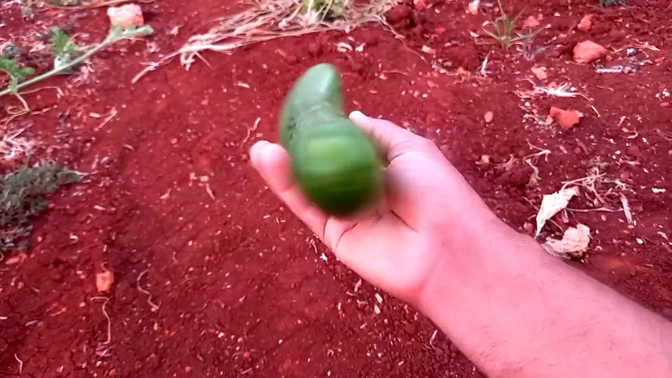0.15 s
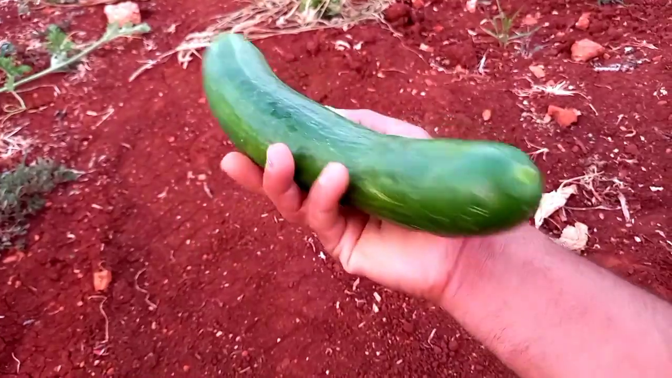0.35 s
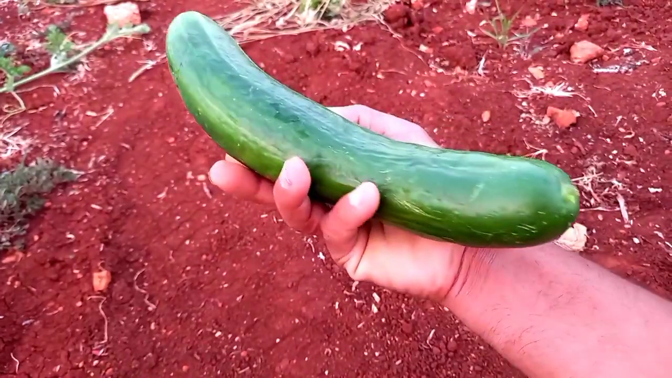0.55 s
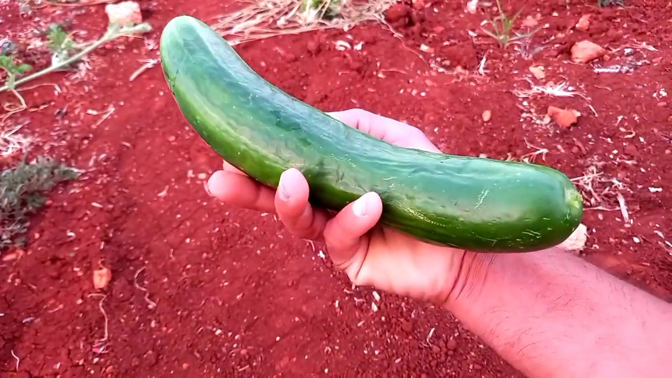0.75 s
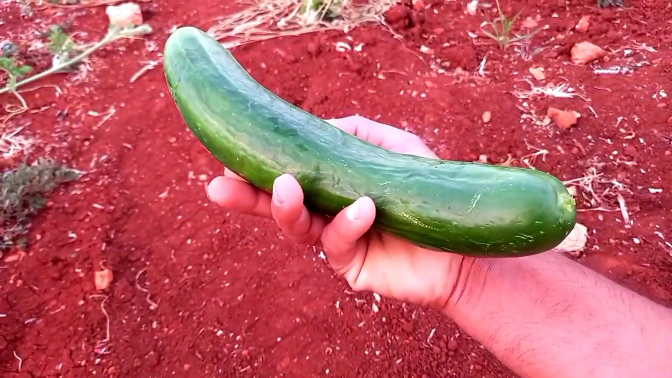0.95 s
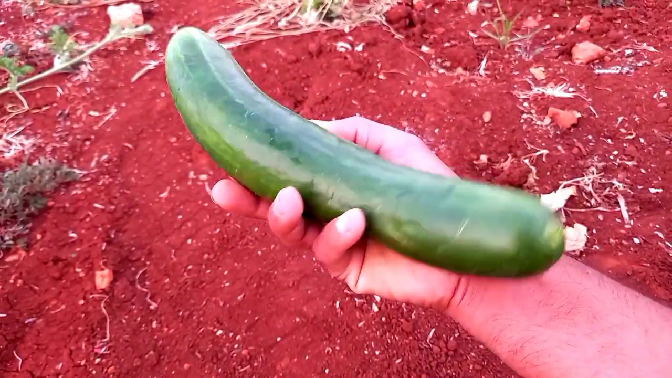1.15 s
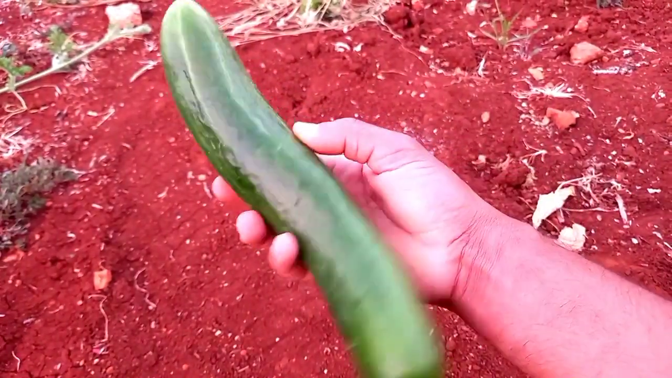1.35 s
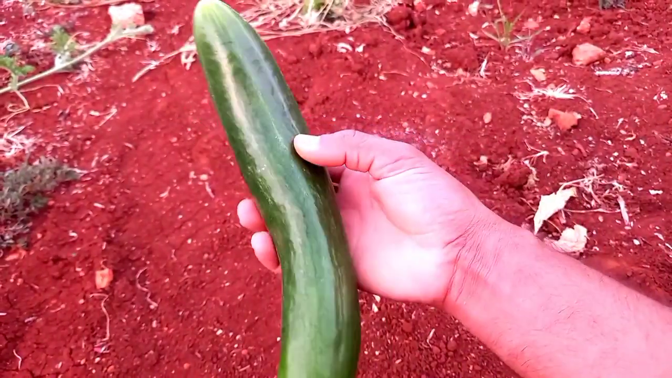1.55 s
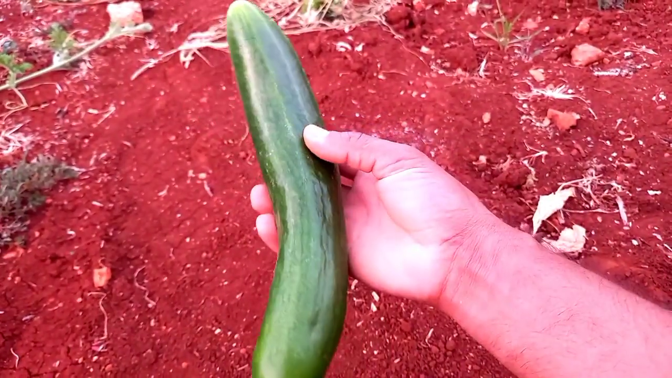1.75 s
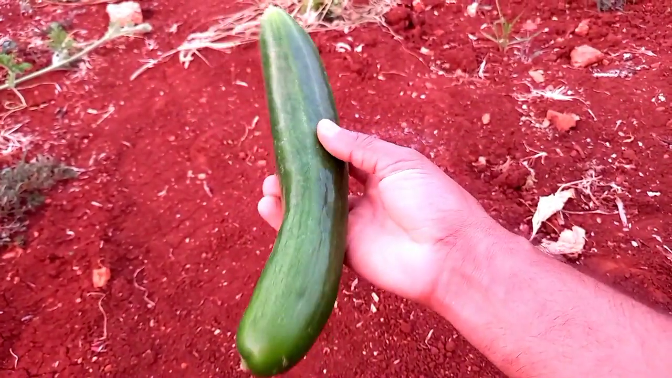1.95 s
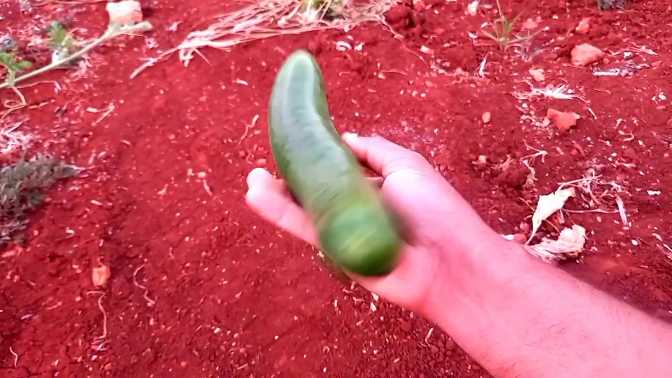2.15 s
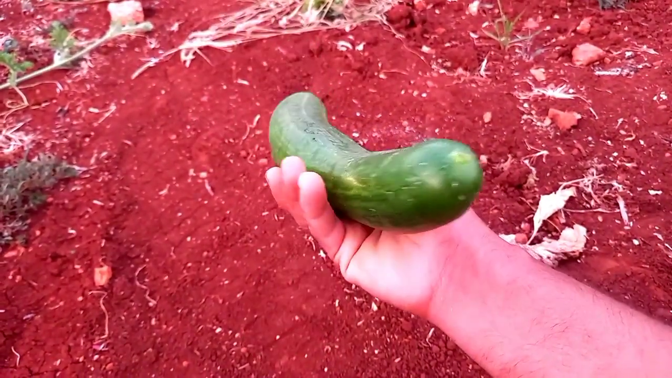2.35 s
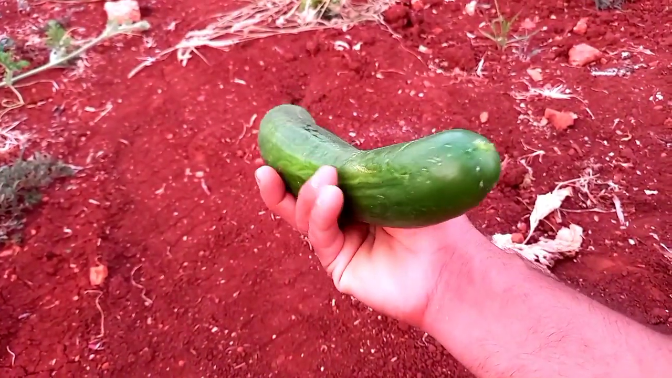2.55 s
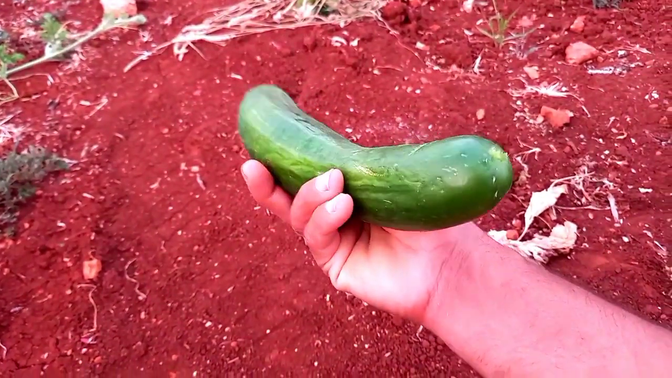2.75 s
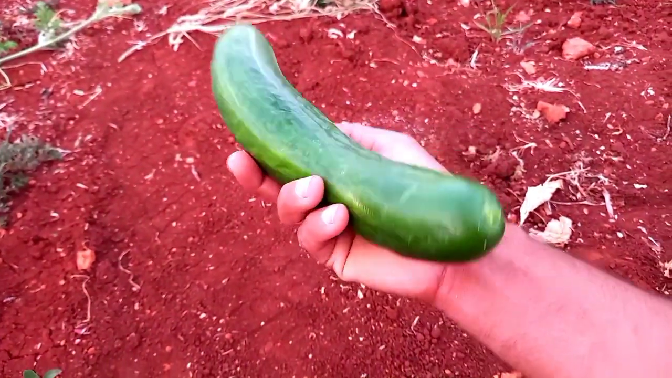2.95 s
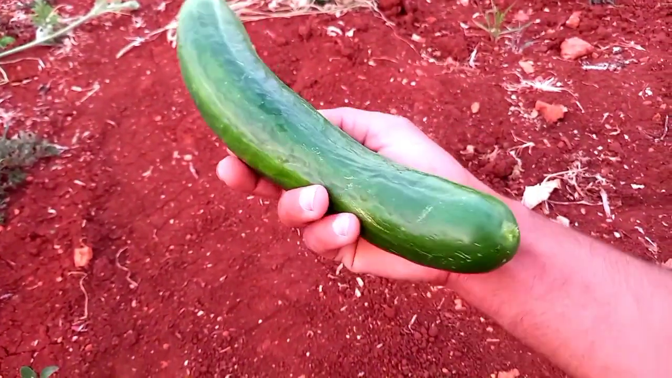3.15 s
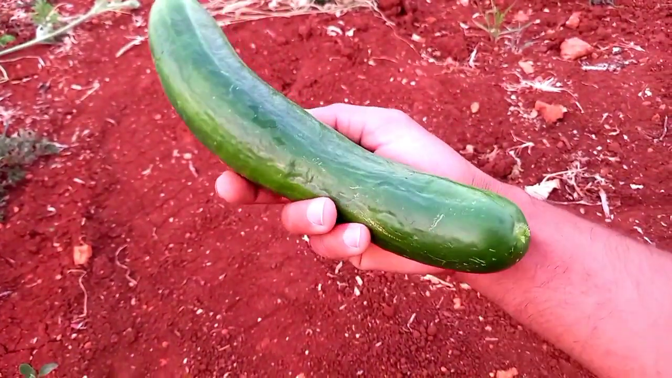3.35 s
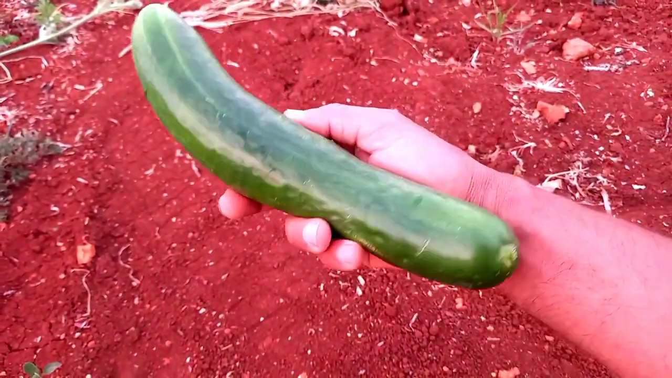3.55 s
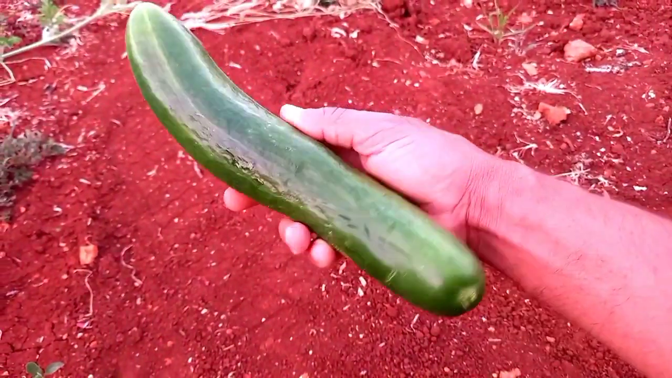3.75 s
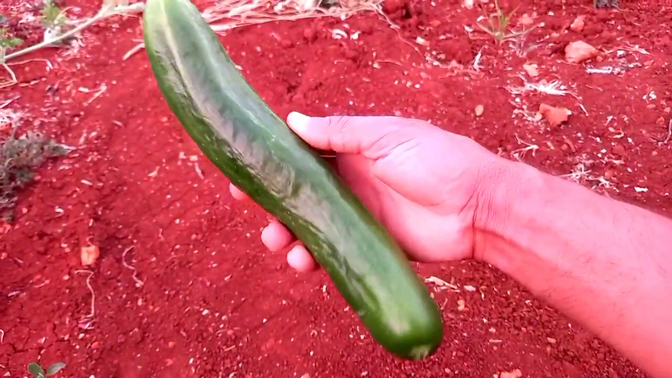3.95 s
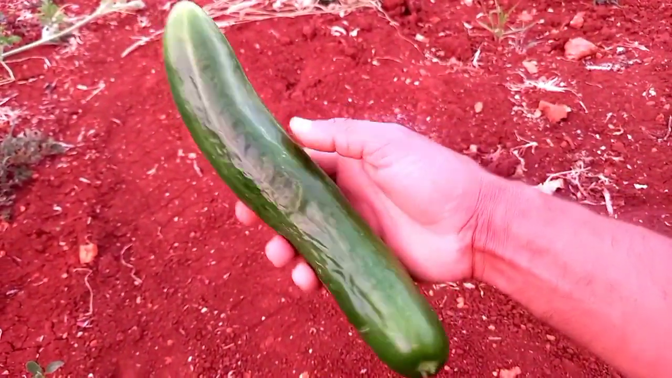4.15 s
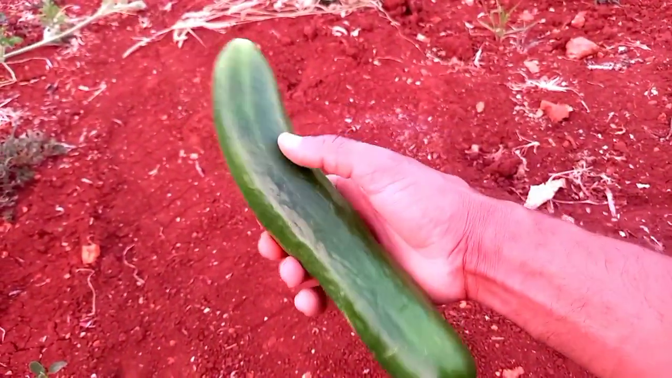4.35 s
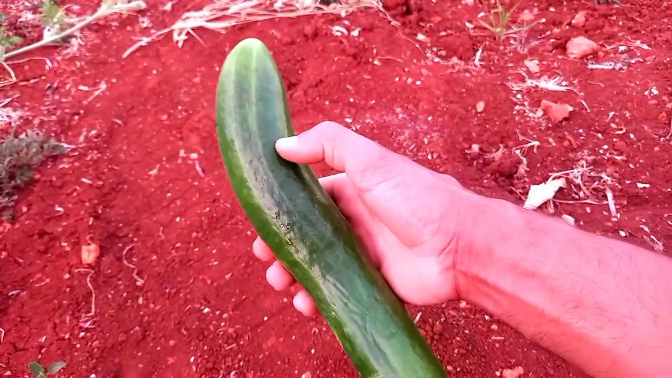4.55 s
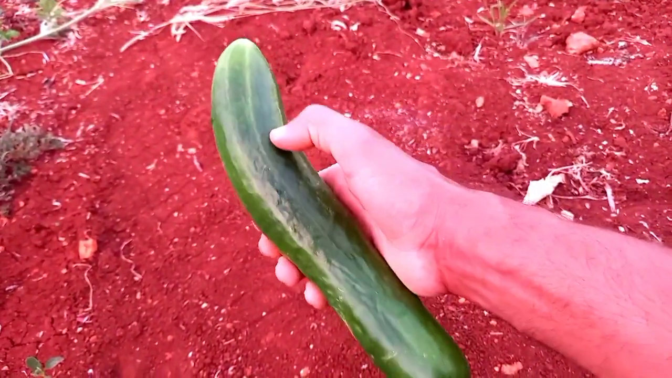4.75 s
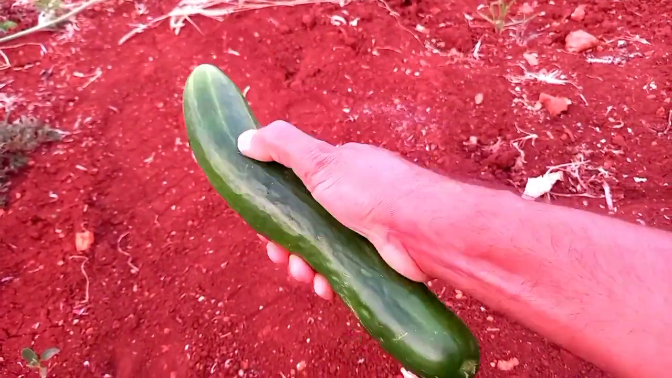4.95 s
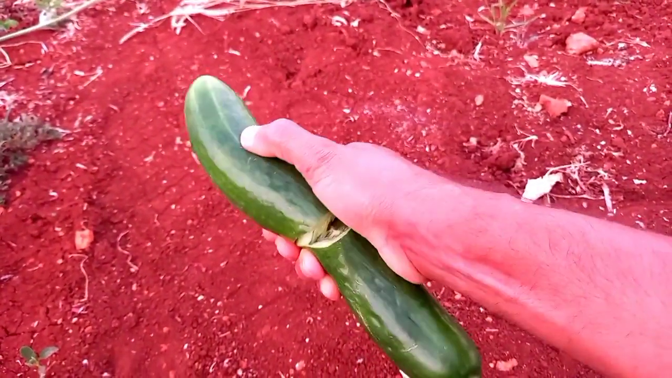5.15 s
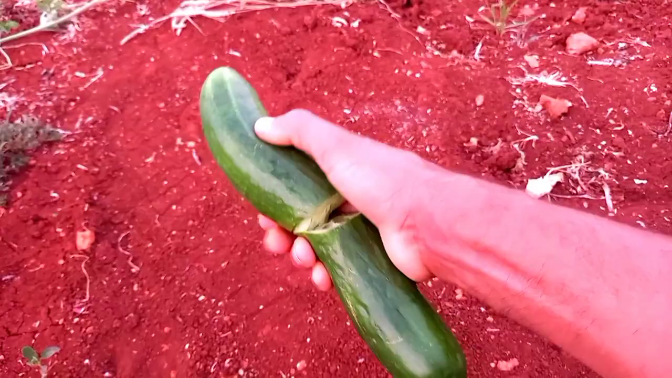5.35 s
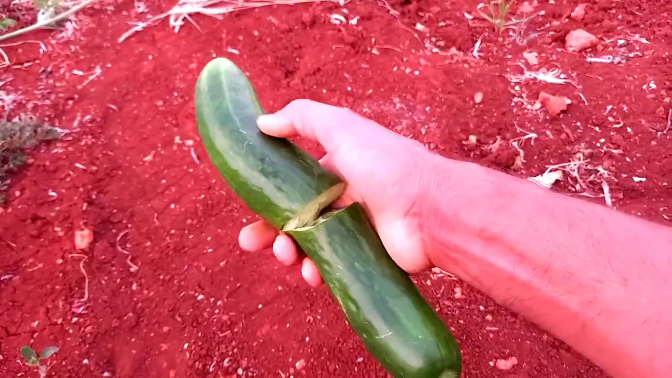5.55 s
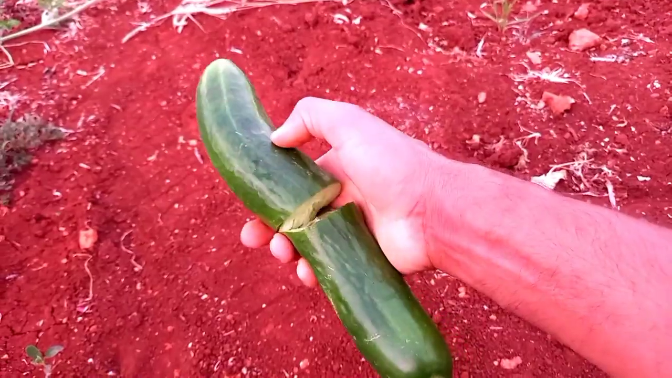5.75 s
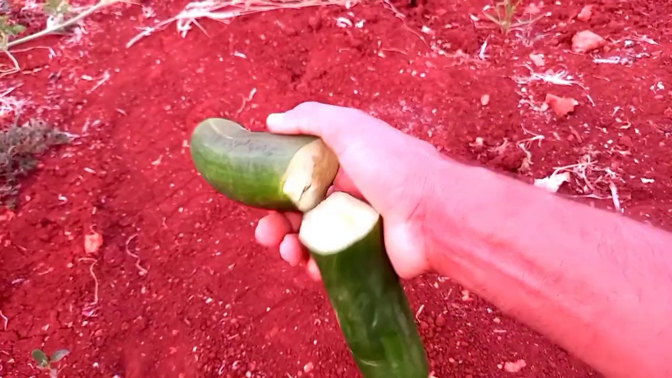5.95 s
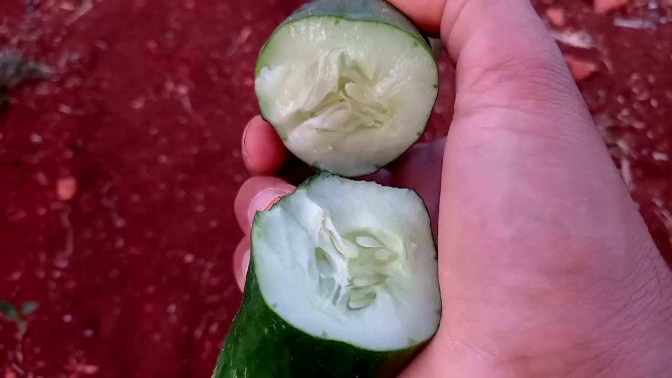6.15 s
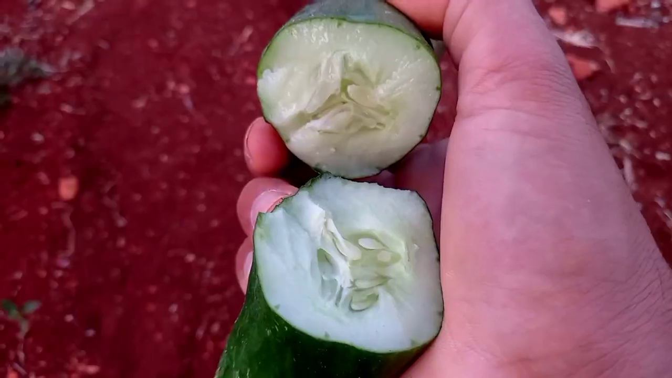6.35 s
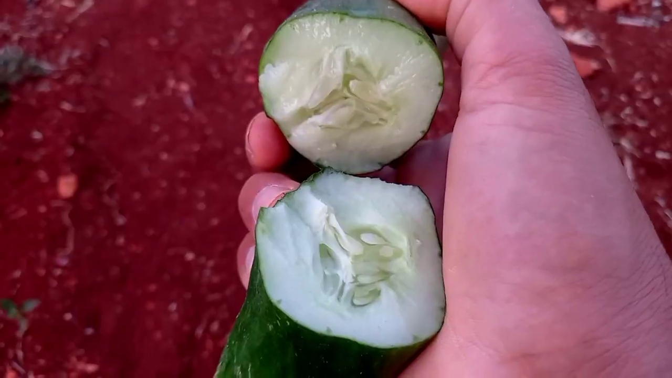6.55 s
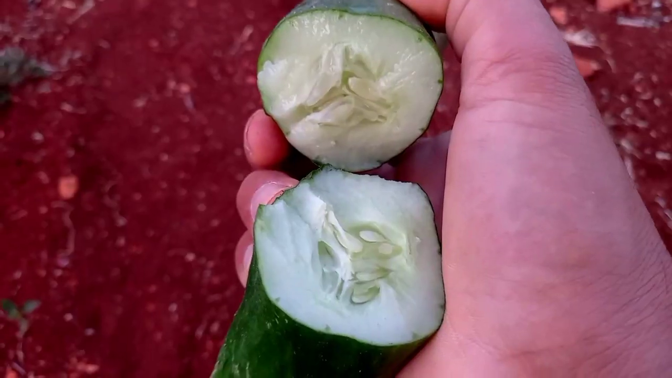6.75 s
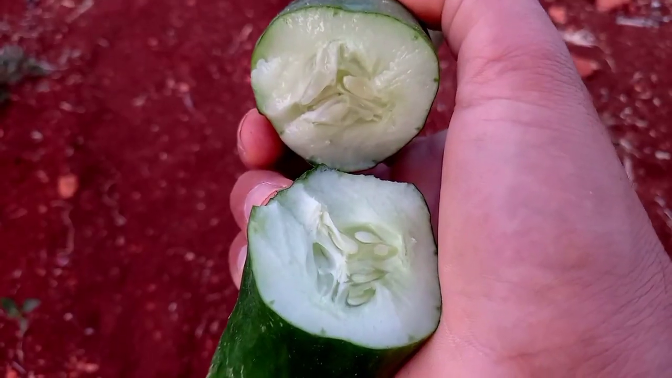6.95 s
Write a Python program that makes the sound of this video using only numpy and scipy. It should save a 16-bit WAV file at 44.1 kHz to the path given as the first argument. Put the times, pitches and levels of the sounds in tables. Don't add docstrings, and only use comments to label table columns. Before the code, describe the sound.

A quiet open field with faint low rumble, thin hiss and almost no reverberation. From 0 to 0.8 s, small sliding bird whistles sound at left while skin softly rubs on cucumber rind; a distant warble comes from ahead at 0.6 and again, clearest, at 1.4 s. Soft low hand bumps occur near 0.7, 2.0 and 2.4 s. From 2.2 s a nearer bird at left chirps in quick short phrases, with a rising ticking trill around 2.8 to 3.05 s, and again near 3.6 and 4.3 s. Grip rub grows slightly. At 5.12 s a very loud, sharp, crisp crack bursts close up, with wet crackle dying in a fraction of a second. Background hiss is a little stronger; whistles return at 5.3 to 5.7 s. From 5.83 s a juicy tear crackles, densest with hollow knocks near 5.9 s, with a last small snap at 6.03 s. A low coo follows, then a fade to silence by 6.4 s.

```python
import sys
import numpy as np
from scipy import signal
from scipy.fft import rfft, irfft
from scipy.io import wavfile
from scipy.ndimage import uniform_filter1d

SR = 44100
rng = np.random.default_rng(int(sys.argv[2]) if len(sys.argv) > 2 else 0)


def file_out(sig):
    cols = np.atleast_2d(sig).T
    lim = np.clip(cols, -1, 1)
    pcm = np.round(lim * 32767).astype(np.int16)
    wavfile.write(sys.argv[1], SR, pcm)


def nominal_scale(level):
    x = np.asarray(level, float) / 20
    return 10 ** x


N = 309164
T = np.arange(N) / SR


def evened(x):
    return x / np.sqrt(np.mean(x ** 2) + 1e-20)


def drift(shape, size):
    return evened(uniform_filter1d(rng.standard_normal(shape), size=size))


def read(points, hz):
    f, value = np.transpose(points)
    return np.interp(np.log(hz + 1), np.log(f + 1), value)


def level(table):
    return nominal_scale(np.interp(T, *np.transpose(table)))


def add(mix, s, sound):
    part = mix[..., round(s * SR):][..., :sound.shape[-1]]
    part += sound[..., :part.shape[-1]]


def colour(x, spectrum):
    db = read(spectrum, abs(np.fft.fftfreq(4096, 1 / SR)))
    log_gain = np.log(nominal_scale(np.maximum(db, -100)))
    taps = np.fft.ifft(np.exp(np.conj(signal.hilbert(log_gain)))).real[:1024]
    return signal.oaconvolve(x, taps[None] / np.linalg.norm(taps))[:, :N]


def ports(x, other, same, lag):
    hz = np.fft.rfftfreq(N, 1 / SR)
    likeness = np.clip(read(same, hz), 0, 1)
    shared = likeness * rfft(x) * np.exp(-2j * np.pi * hz * lag / SR)
    right = shared + np.sqrt(1 - likeness ** 2) * rfft(other)
    return np.array([x, irfft(right, N)])


QUIET_EDGE_HZ = 15600


def wash(spectrum, same, patchy_db, size):
    hz = np.fft.rfftfreq(size, 1 / SR)
    z = signal.stft(ports(*rng.standard_normal((2, N)), same, 22), nperseg=size)[2]
    patches = uniform_filter1d(rng.standard_normal(z.shape[1:]), size=9, axis=0)
    patches = evened(uniform_filter1d(patches, size=5, axis=1))
    z = z * nominal_scale(read(spectrum, hz)[:, None] + patchy_db * patches)
    z = z * (hz < QUIET_EDGE_HZ)[:, None]
    return evened(signal.istft(z, nperseg=size)[1][:, :N])


# f/Hz, level/dB per Hz
RUMBLE = [(12, -58), (20, -25), (48, -18.5), (68, -2.5), (81, 3), (94, -2.5), (114, -9.5), (207, -25),
          (282, -22.5), (375, -30.5), (422, -28), (560, -35), (700, -39), (910, -67), (1540, -120)]
# f/Hz, level/dB per Hz
HISS = [(88, -26.5), (150, 6), (205, -11), (279, -4), (373, -9.5), (420, -8), (561, -12.5), (877, -13.5),
        (2230, -20.5), (3550, -25), (6350, -30), (7410, -33), (12800, -24.5), (15500, -26.5)]
# f/Hz, likeness/0..1
FAR_SAME = [(30, .1), (60, 0.49), (200, 0.35), (400, 0.054), (800, 0.23)]
# t/s, level/dB
LIFT = [(5.1, 5.5), (5.16, 10), (5.8, 9), (6.3, 8.5)]
# t/s, f/Hz, peak level/dB, left-right/dB
BUMPS = [
    (2.4, 78, -49, -6),
    (1.96, 65, -54, -6),
    (.7, 90, -56, 8),
]
RUMBLE_DB, RUMBLE_SHARE, SWELL_DB = -68.5, 0.94, 1.0
HISS_DB = -81.5


def field():
    swell = evened(sum(np.sin(2 * np.pi * (f * T + rng.random())) for f in np.geomspace(.3, 3, num=8)))
    rumble = nominal_scale(RUMBLE_DB + SWELL_DB * swell) * level(LIFT) ** RUMBLE_SHARE
    rumble = rumble * wash(RUMBLE, FAR_SAME, 0.75, size=4096) * nominal_scale([[1.3], [.7]])
    t = np.arange(3000) / SR
    for s, hz, db, pan_db in BUMPS:
        thump = np.hanning(len(t)) * np.sin(2 * np.pi * hz * t)
        add(rumble, s, nominal_scale([[db + pan_db / 2], [db - pan_db / 2]]) * thump)
    hiss = nominal_scale(HISS_DB) * level(LIFT) * wash(HISS, FAR_SAME, 1.0, size=512)
    return rumble + hiss * nominal_scale([[3.6], [2.4]])


def note(hz, db, taper):
    tone = np.sqrt(2) * np.sin(2 * np.pi * np.cumsum(hz) / SR)
    return nominal_scale(db) * tone * signal.windows.tukey(len(hz), min(taper, 1))


def glide(t0, t1, hz0, hz1, db, bow=0):
    u = np.arange(0, 1, 1 / SR / (t1 - t0))
    shake = evened(uniform_filter1d(drift((2, 9000), 220), size=220))[:, :len(u)]
    hz = hz0 + (hz1 - hz0) * u + bow * abs(hz1 - hz0) * np.sin(np.pi * u)
    return t0, nominal_scale(1.8 * shake[1]) * note(hz * (1 + .007 * shake[0]), db, .45)


ZIGZAG = [(0, .91), (.14, 1), (.32, .98), (.47, .89), (.59, .96), (.69, .79), (.85, .92), (1, .73)]


def warble(s, length, top_hz, db):
    u = np.arange(0, 1, 1 / SR / length)
    bend = uniform_filter1d(np.interp(u, *np.transpose(ZIGZAG)), size=200)
    return s, note(top_hz * bend, db, 0.48)


# start t/s, length t/s, top f/Hz, level/dB
WARBLES = [
    (0.628, 0.11, 4650, -76),
    (1.439, 0.09, 4660, -70.5),
    (3.275, .1, 4660, -82),
    (4.121, .1, 4180, -78),
    (4.578, 0.077, 3990, -81),
]
# start t/s, end t/s, start f/Hz, end f/Hz, level/dB
COOS = [
    (1.335, 1.365, 2540, 2500, -81),
    (2.44, 2.604, 1917, 1904, -88),
    (3.17, 3.274, 1842, 1950, -84),
    (3.4, 3.503, 2050, 1900, -82),
    (3.58, 3.64, 2273, 2240, -85),
    (4.46, 4.541, 2150, 1970, -79.5),
    (5.31, 5.353, 1850, 1850, -77),
    (5.8, 5.858, 1860, 1930, -81),
    (6.05, 6.17, 2000, 1980, -74.5),
]


def far_birds():
    ahead = np.zeros(N)
    for row in WARBLES:
        add(ahead, *warble(*row))
    for row in COOS:
        add(ahead, *glide(*row))
    return ahead


# start t/s, end t/s, start f/Hz, end f/Hz, level/dB
WHISTLES = [(0.313, 0.405, 4560, 4770, -66), (.324, 0.402, 3800, 4020, -71),
            (0.175, .195, 3830, 3600, -76.5), (0.477, .552, 4240, 3686, -63.5),
            (0.581, 0.627, 3880, 3440, -70), (0.653, 0.704, 2950, 3750, -61),
            (.69, .745, 3800, 3885, -56.5), (.735, 0.769, 3850, 3190, -58.5),
            (5.274, 5.352, 4710, 4430, -66.5), (5.421, 5.453, 3950, 3670, -62.5),
            (5.615, 5.649, 3500, 3940, -60), (5.636, 5.706, 3994, 3535, -54.5)]
# start t/s, end t/s, start f/Hz, end f/Hz, level/dB
SLIDES = [
    (0.623, 0.658, 3300, 2680, -78),
    (3.116, 3.13, 4100, 2680, -76),
    (3.208, 3.232, 4100, 2400, -75),
    (4.38, 4.42, 4500, 4520, -78),
    (4.938, 4.945, 2450, 2440, -76),
    (5.013, 5.034, 3800, 2560, -77),
    (5.548, 5.618, 2200, 2960, -79.5),
    (5.75, 5.813, 5380, 5310, -74.5),
    (5.693, 5.73, 4620, 4400, -72),
]
WHISTLE_BOW = .33


def whistlers():
    left = np.zeros(N)
    for row in WHISTLES:
        add(left, *glide(*row, bow=WHISTLE_BOW))
    for row in SLIDES:
        add(left, *glide(*row))
    return left


# first note t/s, last note t/s, f/Hz, lead level/dB, level/dB
PHRASES = [
    (2.228, 2.2935, 5050, -64, -72),
    (2.504, 2.582, 5350, -63.5, -62),
    (2.931, 3.065, 5810, -62.5, -56.5),
    (3.56, 3.663, 5830, -67, -67),
    (4.299, 4.401, 5790, -66, -62),
    (5.047, 5.096, 5600, -83, -64),
]
NOTE_GAP_S, LEAD_HZ = .026, 6320
PITCH_SAG, FADE_DB_PER_NOTE = 0.02, -1.5


def arches():
    for t0, t1, hz, lead_db, db in PHRASES:
        times = np.linspace(t0, t1, round((t1 - t0) / NOTE_GAP_S) + 1)
        yield t0, LEAD_HZ, lead_db
        for k, s in enumerate(times[1:]):
            top_hz = hz * (1 - PITCH_SAG * k + .012 * rng.standard_normal())
            yield s, top_hz, db + FADE_DB_PER_NOTE * k + 1.7 * rng.standard_normal()


# start t/s, end t/s, start f/Hz, end f/Hz, level/dB
TRILL = (2.772, 3.05, 3700, 4350, -73)


def near_bird():
    near = np.zeros(N)
    u = np.linspace(-1, 1, num=SR // 45)
    for s, hz, db in arches():
        add(near, s - 1 / 90, note(hz * (1 - .33 * u ** 2), db + 1.5, .8))
        rasp = rng.uniform(5900, 6700) * (1 + .07 * drift(len(u), 40))
        add(near, s + .004, note(rasp, db - 14.0, 1.0))
    t0, t1, hz0, hz1, db = TRILL
    for s in np.arange(t0, t1, .0206):
        hz = hz0 + (hz1 - hz0) * (s - t0) / (t1 - t0)
        swell_db = 8 * min((s - t0) / .08 - 1, 0)
        add(near, s, note(hz * np.linspace(1.07, .92, num=350), db + swell_db, .9))
    return near


def echoed(x, wet_db, t60, pan_db, lag=20):
    t = np.arange(SR // 3) / SR
    hits = rng.standard_normal((2, len(t))) * (rng.random((2, len(t))) < .03)
    taps = hits * nominal_scale(-60 * t / t60) * (t > .006)
    wet = signal.oaconvolve(x[None], taps / np.linalg.norm(taps[0]))[:, :N]
    return (np.array([x, np.roll(x, lag)]) + nominal_scale(wet_db) * wet) * nominal_scale([[0], [-pan_db]])


def birds():
    far = echoed(far_birds(), wet_db=-5, t60=.3, pan_db=1)
    whistles = echoed(whistlers(), wet_db=-7, t60=.42, pan_db=11)
    return far + whistles + echoed(near_bird(), wet_db=-9, t60=.18, pan_db=6)


# top t/s, rise t/s, fall t/s, skin level/dB, leaf level/dB
MOVES = [(0.0, .1, 0.062, -85, -71.5), (.24, 0.21, 0.22, -81.5, -72.5), (1.28, 0.082, 0.17, -83.5, -74.5),
         (1.43, 0.17, 0.082, -77.5, -80), (2.54, 0.1, 0.054, -84, -110), (2.97, 0.058, 0.08, -82, -110),
         (3.98, .15, 0.21, -100, -87), (4.55, 0.18, .2, -95.5, -88), (4.37, 0.11, 0.1, -73, -96),
         (5.2, 0.13, 0.051, -67.5, -74), (5.32, .04, 0.028, -87.5, -72.5), (5.43, 0.036, .02, -85, -71),
         (5.56, .025, 0.072, -72, -70.5), (5.84, 0.013, .1, -71, -69), (6.06, .25, 0.062, -72, -85)]
MOVE_EDGE_DB = -16.5


def moves():
    s, rise, fall, skin_db, leaf_db = np.transpose(MOVES)[:, :, None]
    shape = nominal_scale(MOVE_EDGE_DB * np.maximum((s - T) / rise, (T - s) / fall))
    return (nominal_scale(skin_db) * shape).sum(axis=0), (nominal_scale(leaf_db) * shape).sum(axis=0)


# f/Hz, level/dB per Hz
RIND = [(470, -44), (800, -11), (952, -12.5), (1030, -25), (1180, -8.5), (1350, -11.5), (1910, -7),
        (2470, -9.5), (2800, -6.5), (4710, -11.5), (6430, -6.5), (7740, -20.5), (15500, -15.5)]
# f/Hz, level/dB per Hz
LEAF = [(2500, -34), (3600, -16.5), (5200, -10.5), (6000, -6.5), (6500, -0.5), (6950, -2.5), (7300, -27),
        (8000, -49)]
# f/Hz, likeness/0..1
NEAR_SAME = [(300, 0.98), (2000, 0.63), (6000, 0.23), (15000, 0.5)]
GRIP_DB, GRIP_SLOPE = -116, 3.99


def rub():
    grain = nominal_scale([[2.1], [2.5]] * drift((2, N), 150))
    slide, stir = moves()
    slide = slide + nominal_scale(GRIP_DB) * level(LIFT) ** GRIP_SLOPE
    skin = slide * grain[0] * wash(RIND, NEAR_SAME, 2.0, size=512) * nominal_scale([[4.1], [2.9]])
    leaves = stir * grain[1] * wash(LEAF, FAR_SAME, 2.3, size=256) * nominal_scale([[2.1], [-1.1]])
    return skin + leaves


# t/s, f/Hz, peak level/dB, rise t/s, t60 t/s, left-right/dB
BURST = [(5.12042, 5050, -1.5, .0005, .003, 2), (5.12115, 650, -9, .0003, .0065, -1),
         (5.1209, 400, -21, .0008, .018, 0), (5.1207, 2700, -20, .0005, .01, 2),
         (5.12075, 1550, -15, .0005, .008, 4), (5.1216, 5900, -12, .0006, .01, 5),
         (5.1225, 1895, -19, .002, .025, 2), (5.1305, 2000, -25, .002, .03, 0),
         (5.126, 84, -32, .02, .24, 0), (5.1245, 115, -36, .008, .1, 0), (5.14, 1950, -29, .0015, .03, 0),
         (5.141, 520, -47, .001, .02, 0), (5.243, 550, -57, .001, .012, 0),
         (5.9295, 380, -44, .001, .03, 0), (5.919, 600, -46, .001, .02, -2)]
RING_EDGE = 0.5


def burst():
    out, t = np.zeros((2, N)), np.arange(SR // 3) / SR
    for s, hz, db, rise, t60, pan_db in BURST:
        onset = np.sin(np.pi / 2 * np.minimum(t / rise, 1)) ** 2
        shape = onset * nominal_scale(db - 60 * np.maximum(t - rise, 0) / t60)
        edge = signal.butter(2, RING_EDGE * hz, 'high', fs=SR)
        ring = signal.lfilter(*edge, shape * np.sin(2 * np.pi * hz * t))
        add(out[0], s, ring * nominal_scale(pan_db / 2))
        add(out[1], s + 4 / SR, ring * nominal_scale(-pan_db / 2))
    return out


# t/s, fizz peak level/dB, flesh knock level/dB, length t/s
SPLITS = [
    (5.1204, -14, -24, 0.00053),
    (5.1222, -24, -26, 0.00076),
    (5.1236, -21, -24, 0.00062),
    (5.1249, -20, -26, 0.00038),
    (5.1305, -29, -36, 0.00081),
    (5.132, -25, -32, 0.0009),
    (5.1402, -25, -29, 0.00039),
    (5.1512, -42, -45, 0.00033),
]
# t/s, fizz peak level/dB, flesh knock level/dB, length t/s
FIBRES = [(5.8341, -50, -61, 0.00041), (5.86, -38, -51, .0004), (5.8645, -24, -25, .0005),
          (5.8774, -30, -35.5, .0005), (5.8824, -28, -30, .0004), (5.8864, -25, -35, .0004),
          (5.8888, -23.5, -28, .0003), (5.8956, -16, -22, .00025), (5.8985, -24.5, -36, .0004),
          (5.9003, -27, -29, .0004), (5.9036, -20, -32, .0003), (5.9078, -22.5, -34, .0004),
          (5.9136, -25, -28, .0004), (5.9186, -22, -22.5, .0004), (5.9198, -22, -12.5, .0003),
          (5.9302, -19, -5.5, .0004), (5.938, -24, -10.5, .0004), (5.9688, -27, -34, .0004),
          (6.031, -30.5, -23, .0004)]
# f/Hz, level/dB per Hz
FLESH = [(250, -42.5), (450, -32), (1000, -22.5), (1400, -1), (2360, -1), (2900, -4), (3900, -3),
         (4900, -5.5), (6500, 3), (7400, -6.5), (8050, -33), (8700, -7), (15400, -3), (16500, -43.5)]
# t/s, level/dB
PULL = [(5.82, -77), (5.858, -70.5), (5.866, -44), (5.885, -34), (5.92, -29), (5.94, -30.5), (5.96, -46.5),
        (6.028, -60.5), (6.06, -81)]
KNOCK_HZ, KNOCK_WIDTH_HZ, KNOCK_EDGE_HZ = 1800, 430, 1200
BURST_S, CRACKLE_RISE_S = 5.122, .0035
CRACKLE_DB, CRACKLE_T60, SEEP_DB, SEEP_T60 = -32, 0.032, -56, 0.44


def tearing():
    puffs, knocks, t = np.zeros(N), np.zeros(N), np.arange(400) / SR
    for s, fizz_db, knock_db, length in SPLITS + FIBRES:
        add(puffs, s, nominal_scale(fizz_db) * t / length * np.exp(1 - t / length))
        hz = KNOCK_HZ * (1 + .09 * rng.uniform(-0.42, 1))
        ring = np.exp(-np.pi * KNOCK_WIDTH_HZ * t) * np.sin(2 * np.pi * hz * t)
        add(knocks, s, nominal_scale(knock_db) * np.sin(np.pi / 2 * np.minimum(t / .0005, 1)) ** 2 * ring)
    knocks = signal.sosfilt(signal.butter(3, KNOCK_EDGE_HZ, 'high', fs=SR, output='sos'), knocks)

    sizes = nominal_scale(4 * np.minimum(rng.exponential(1, N), 4)) * (rng.random(N) < 1800 / SR)
    crackle = evened(signal.lfilter([1], [1, -.94], sizes) + .45)
    after, before = np.maximum(T - BURST_S, 0), np.maximum(BURST_S - T, 0)
    dying = nominal_scale(CRACKLE_DB - 60 * after / CRACKLE_T60) + nominal_scale(SEEP_DB - 60 * after / SEEP_T60)
    pull = level(PULL) * (T > PULL[0][0])
    crackle = crackle * (dying * nominal_scale(-20 * before / CRACKLE_RISE_S) + pull)

    fizz = ports(*(rng.standard_normal((2, N)) * (puffs + crackle)), NEAR_SAME, 4)
    knocks = np.array([knocks, np.roll(knocks, shift=4)])
    return colour(fizz, FLESH) * nominal_scale([[1.1], [-1.1]]) + knocks * nominal_scale([[5], [2]])


def scene():
    return field() + birds() + rub() + burst() + tearing()


def low_pass(x):
    return signal.sosfilt(signal.butter(12, 16970, fs=SR, output="sos"), x)


# t/s, t/s
FADE = (6.315, 6.382)


def record(dry):
    fade = np.clip((FADE[1] - T) / (FADE[1] - FADE[0]), 0, 1) ** 1.9
    return low_pass(dry * fade)


dry = scene()
out = record(dry)
file_out(out)
```